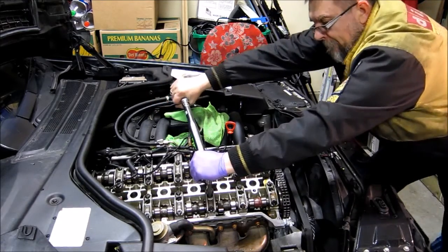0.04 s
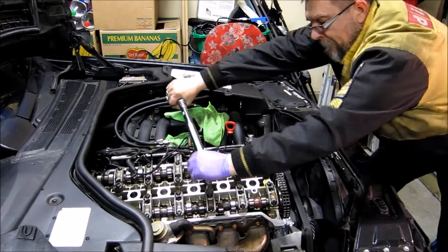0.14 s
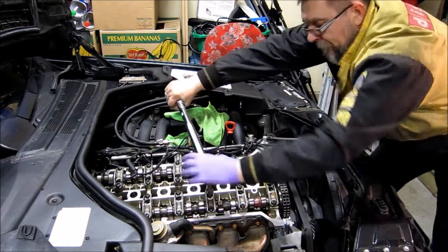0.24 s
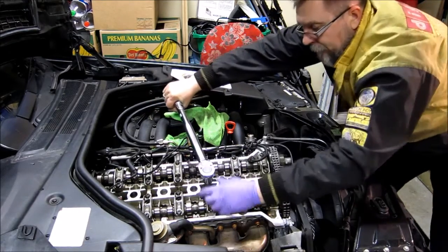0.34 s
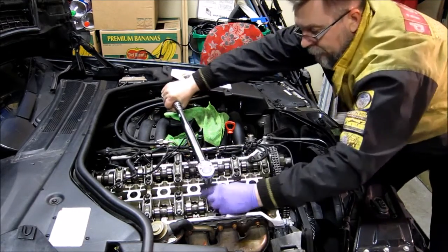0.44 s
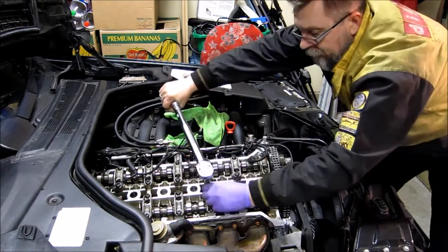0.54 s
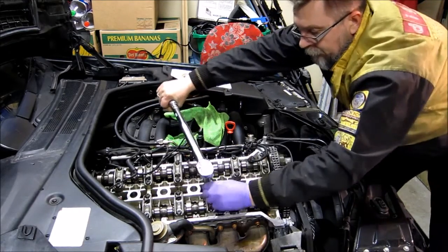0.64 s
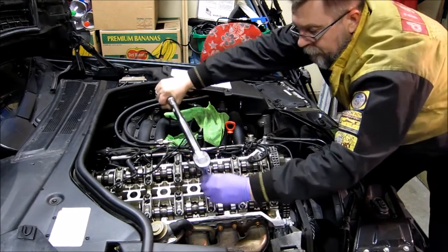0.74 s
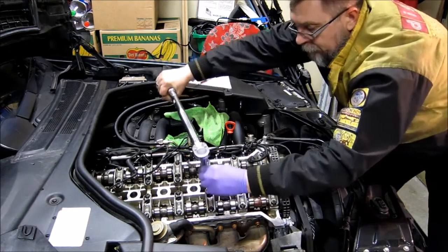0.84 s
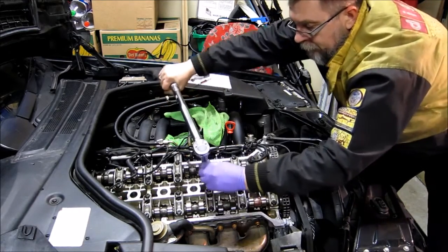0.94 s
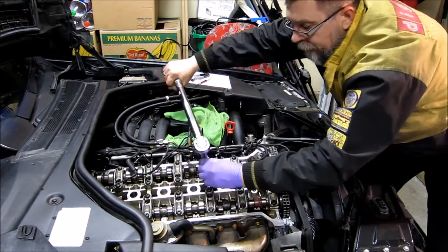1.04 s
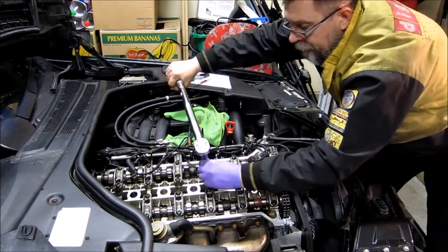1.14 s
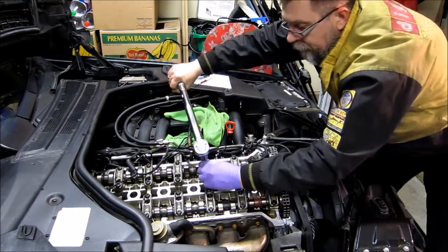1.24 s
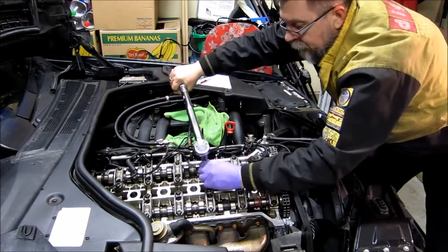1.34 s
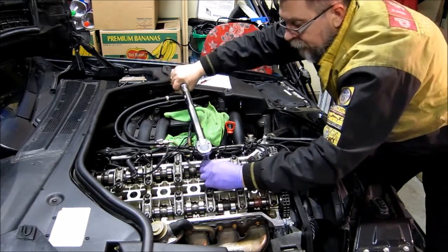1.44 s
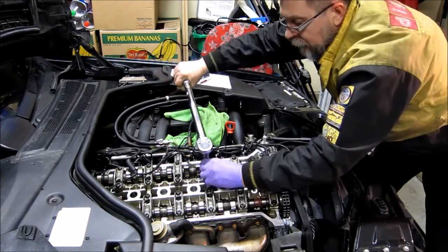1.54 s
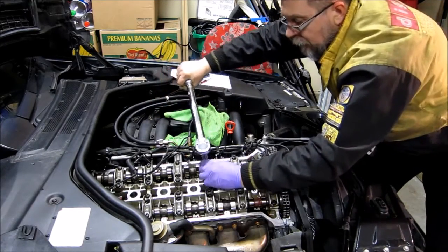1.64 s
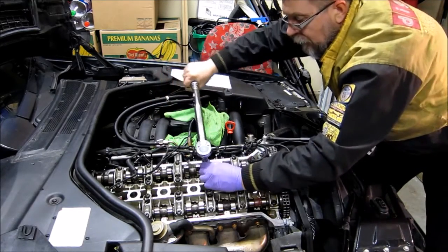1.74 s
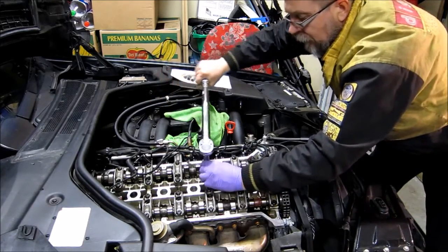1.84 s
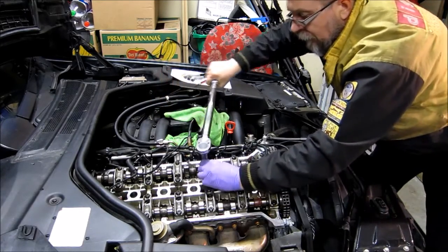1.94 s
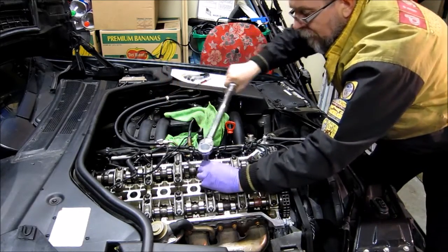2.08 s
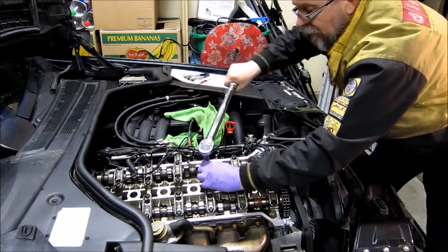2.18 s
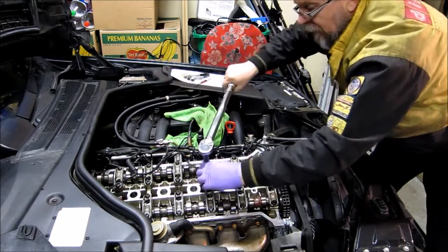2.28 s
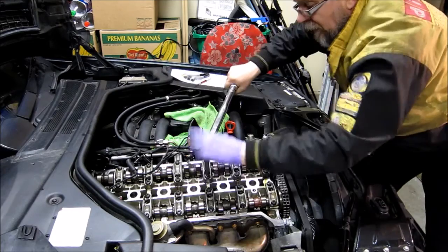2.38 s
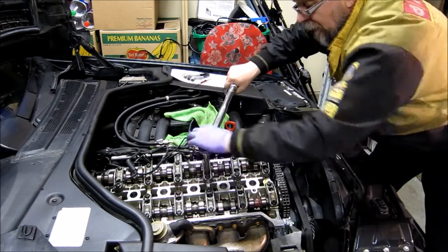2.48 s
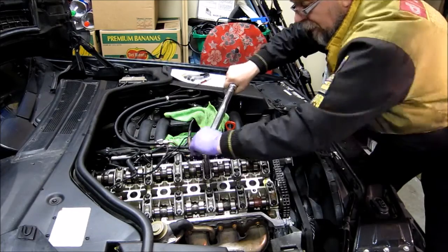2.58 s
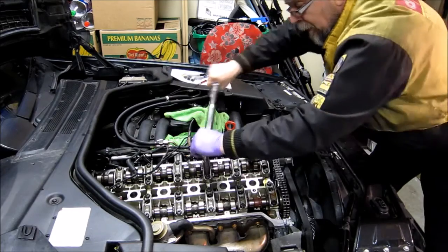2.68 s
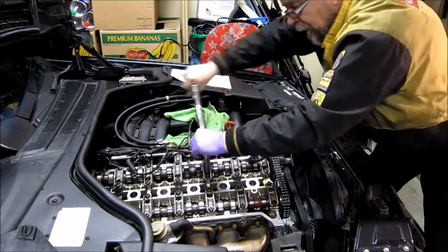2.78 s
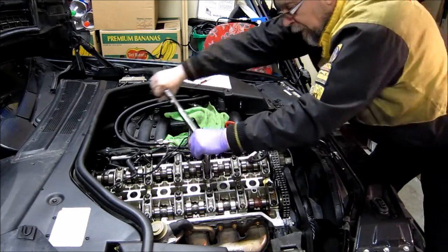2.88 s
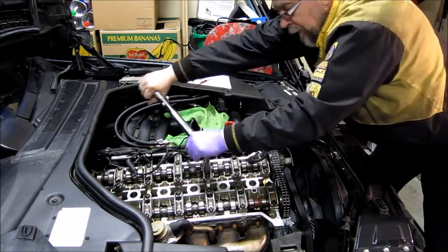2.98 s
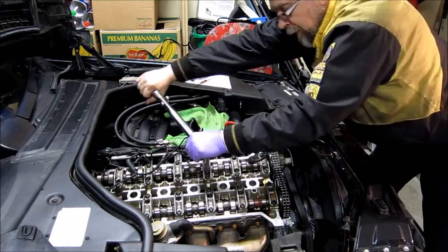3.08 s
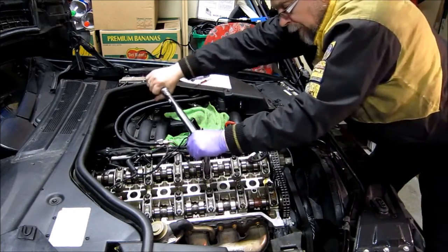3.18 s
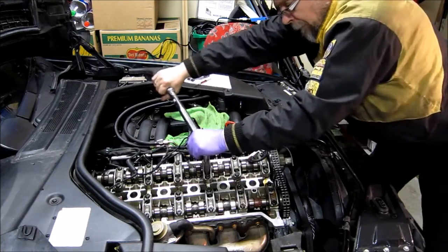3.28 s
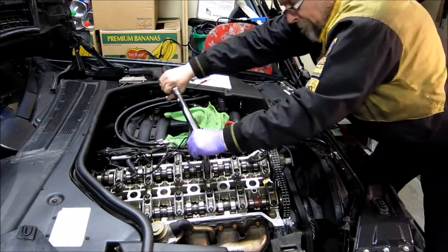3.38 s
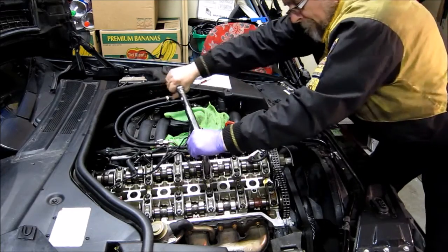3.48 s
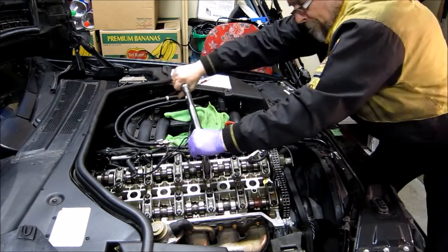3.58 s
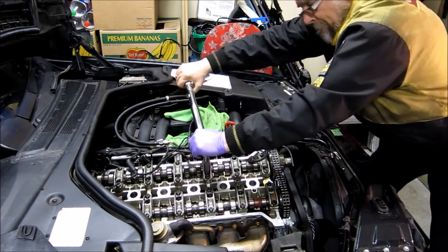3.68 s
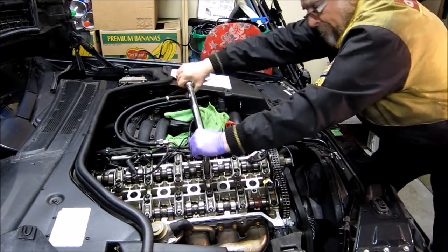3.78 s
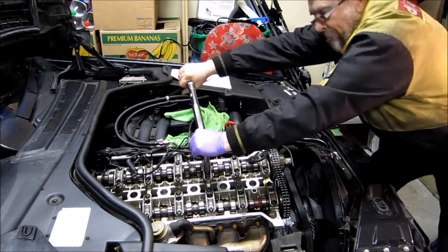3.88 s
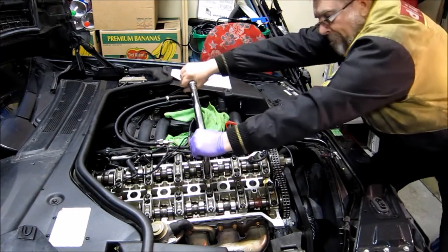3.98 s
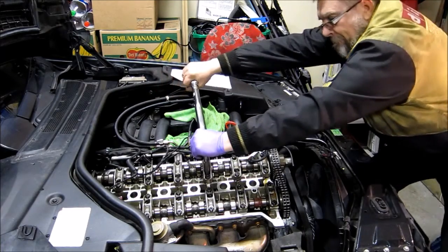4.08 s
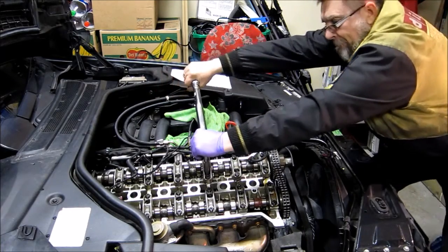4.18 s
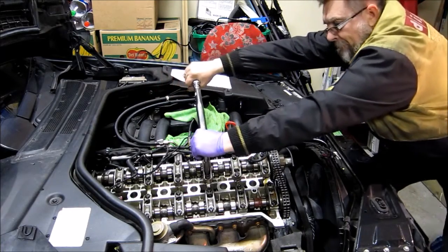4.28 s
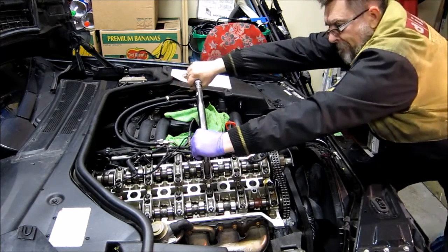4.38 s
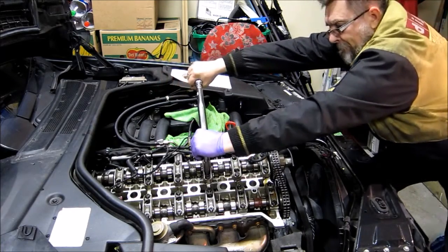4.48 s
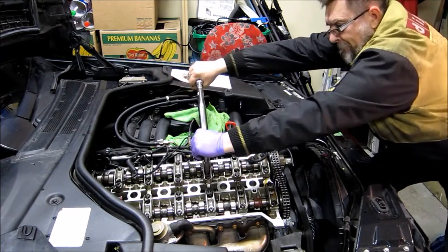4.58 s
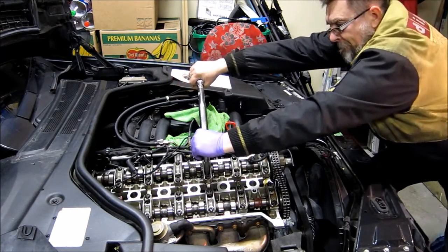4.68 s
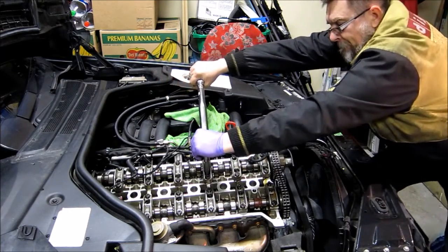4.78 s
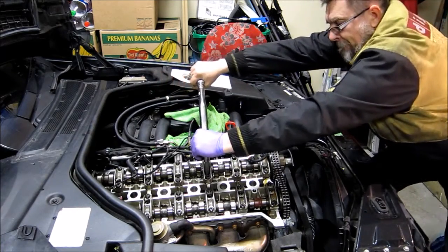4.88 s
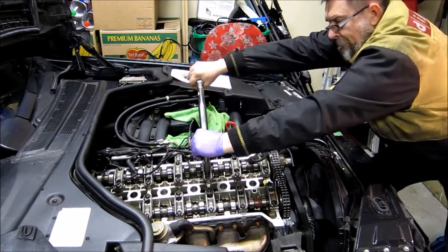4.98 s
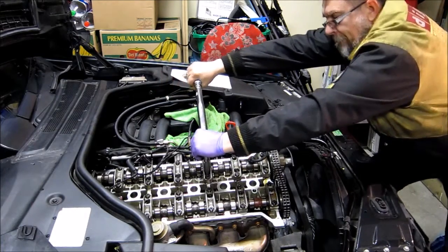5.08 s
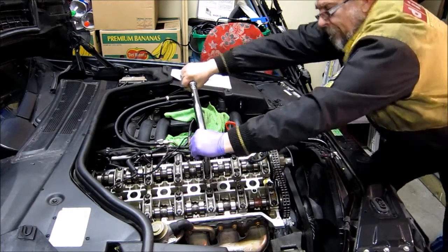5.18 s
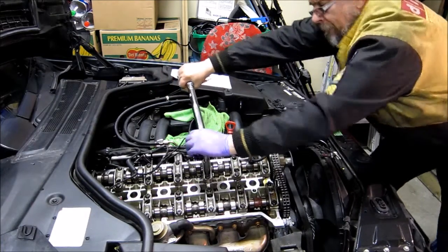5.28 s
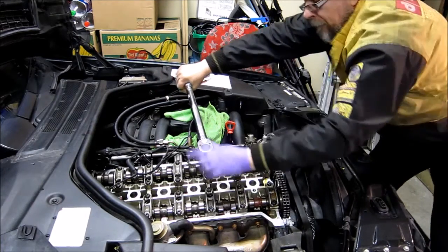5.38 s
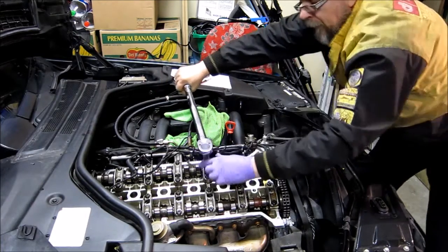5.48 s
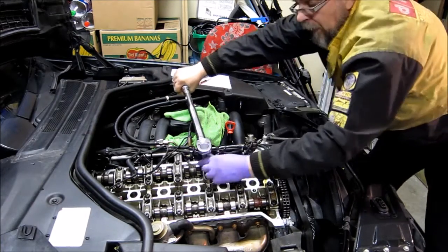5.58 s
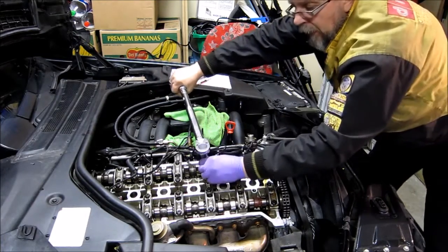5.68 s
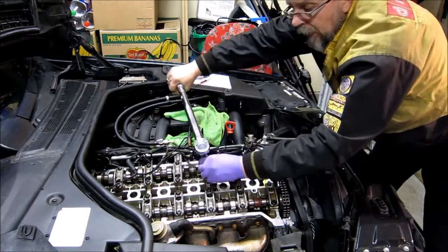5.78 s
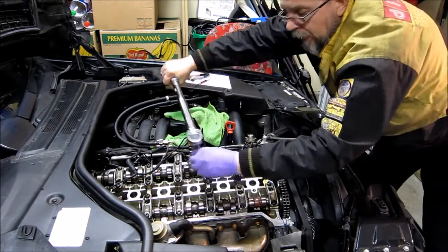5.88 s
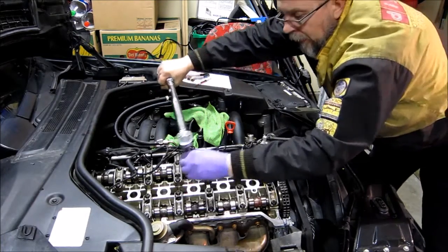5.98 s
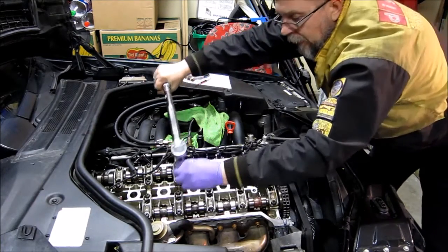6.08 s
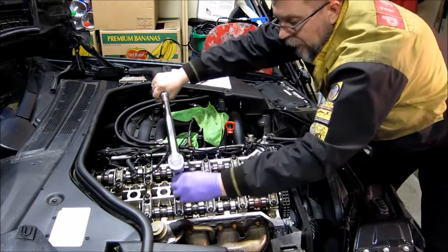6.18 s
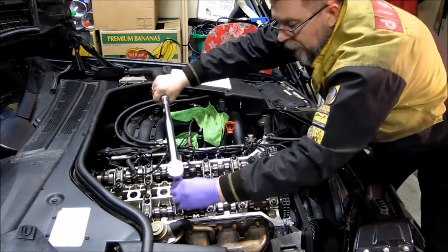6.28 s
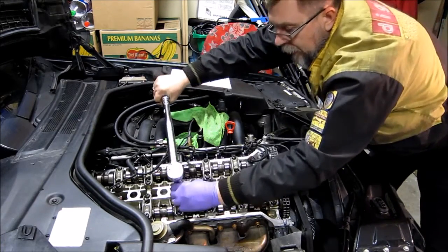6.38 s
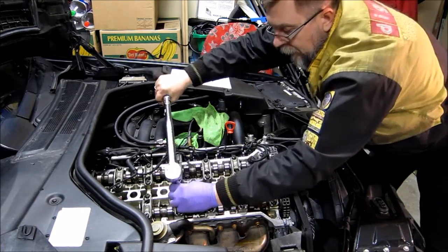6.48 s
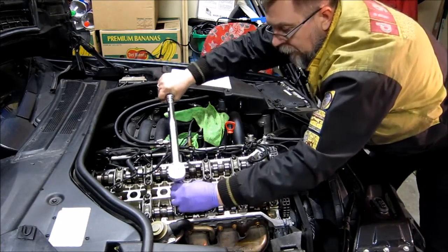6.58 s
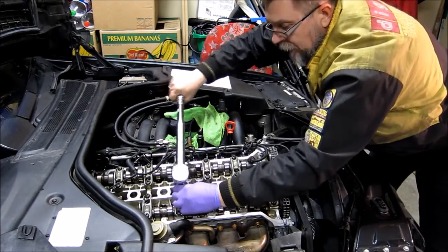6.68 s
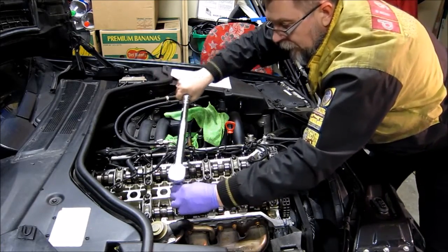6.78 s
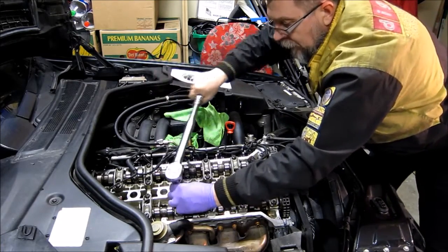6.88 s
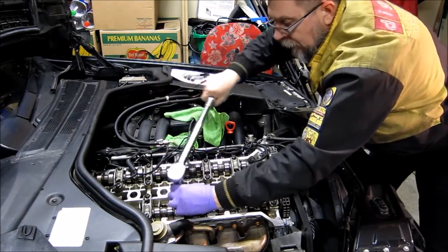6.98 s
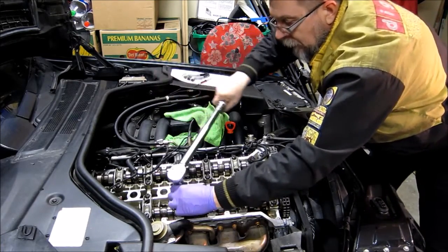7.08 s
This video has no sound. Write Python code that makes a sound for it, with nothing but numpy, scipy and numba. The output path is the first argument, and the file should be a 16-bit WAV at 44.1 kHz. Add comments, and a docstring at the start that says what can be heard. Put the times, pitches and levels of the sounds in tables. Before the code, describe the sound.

In a small garage, a torque wrench snaps sharply at once, then its steel socket clinks and rattles from bolt to bolt. A quieter pull with a faint low drone leads to two very hard clicks half a second apart, then more knocks. Close stereo microphones catch short engine-bay echoes; fan hum ducks after loud hits and swells back.

```python
"""Torque wrench in a small garage

A click-type torque wrench tightens bolts on an open cylinder head: bursts of tiny steel contacts
excite resonances, giving sharp cracks and the knocks and rattles of its socket from bolt to bolt.
Steady tones and shaped noise make the fan behind, with a low drone and a few dull thumps.
An automatic gain control ducks at each loud click and lets the hum swell back."""
import sys
import numpy as np
from scipy import signal
from scipy.fft import rfft, irfft
from scipy.io import wavfile
from scipy.ndimage import uniform_filter1d, minimum_filter1d
from numba import njit

SR = 44100
rng = np.random.default_rng(int(sys.argv[2]) if len(sys.argv) > 2 else 0)


def master(y):
    """Save y as 16-bit WAV."""
    cut = np.clip(np.atleast_2d(y).T, -1, 1)
    pcm = np.round(cut * 32767)  # scale
    wavfile.write(sys.argv[1], SR, pcm.astype(np.int16))


N = 314874
TIME = np.arange(N) / SR
SIZE = 18432  # samples in one blow or echo response
FREQ = np.maximum(np.fft.rfftfreq(SIZE, 1 / SR), 1)
AGE = np.arange(SIZE) / SR
LEAD_IN = SIZE // 32  # samples before the hit, room for its build-up
# a long ring dies away to nothing by the end of its buffer
FADE = np.minimum(1, 3 * (1 - AGE / AGE[-1])) ** 2


def undb(db):
    """Decibels to gain."""
    return 10 ** (np.asarray(db) / 20)


def read(points, hz):
    """A table of (Hz, value) read on a log-frequency axis."""
    f, value = np.transpose(points)
    return np.interp(np.log(np.maximum(hz, 1)), np.log(f), value)


def unit(x):
    """Scale to an energy of one."""
    return x / np.sqrt(np.sum(x ** 2, axis=-1, keepdims=True))


def causal(db):
    """The minimum-phase response that has these gains."""
    cepstrum = irfft(db * np.log(10) / 20)
    cepstrum[1:SIZE // 2] *= 2
    cepstrum[SIZE // 2 + 1:] = 0
    return np.exp(rfft(cepstrum))


def resonance(f, hz, width):
    """Response of one mode, gain 1 at its centre."""
    return 1j * f * width / (hz ** 2 - f ** 2 + 1j * f * width)


def mode(hz, t60):
    """A resonance that rings for t60 seconds; steel that is not quite round splits it into a close pair."""
    width = np.log(1000) / np.pi / t60
    lower, upper = resonance(FREQ, hz * .996, width), resonance(FREQ, hz * 1.004, width)
    return (lower + upper) / np.sqrt(2)


def noise(gain):
    """Noise of rms 1 whose spectrum follows gain(Hz)."""
    spectrum = rfft(rng.standard_normal(N))
    x = irfft(spectrum * gain(np.fft.rfftfreq(N, 1 / SR)), N)
    return x / x.std()


def walk(rate):
    """A slow random wander of spread 1."""
    return noise(lambda f: np.exp(-(f / rate) ** 2))


# the wrench breaking over or snapping back; tilt is per octave, ring levels precede the shared body colour:
# start_s, level_db, rattle_ms, thud_db, tilt_db, first_brief_hz, first_brief_db,
# second_brief_hz, second_brief_db, long_ring_hz, long_ring_db
CLICKS = [(0.1121, 3, 3.85, -3, 0, 1818, 13, 2375, 16.5, 2660, 9.5),
          (4.7179, 14.5, 1.94, 3.5, 1.6, 2150, 12, 4060, 9, 4145, 8.5),
          (5.2105, 10.5, 3.9, -5.5, -0.06, 2215, 21.5, 755, 2.5, 2220, 9.5)]
# relative colour of the wrench steel: pitch_hz, level_db
WRENCH_STEEL = [(90, -25), (300, -18.5), (700, -13), (1300, -17), (1700, -11), (2200, -12.5), (3000, -1.5),
                (4000, -0.5), (5500, -4), (6800, -3.5), (10000, -6.5), (12500, -12.5), (16000, -33.5)]
# short resonances of the click mechanism, levels before modes_db: pitch_hz, width_hz, level_db
MECHANISM_MODES = [(316, 20, 9), (1770, 570, -1), (2150, 240, 6), (2320, 40, -6), (3180, 190, -9.5),
                   (3950, 78, -5.5), (4720, 140, -7.5), (6000, 180, -2.5), (6640, 140, 4.5), (7250, 48, -7),
                   (10000, 330, -8.5)]
# what all clicks share: a quick build-up, their treble, and the ring times of brief and long modes
CLICK_LEAD_MS, CLICK_TREBLE_DB, CLICK_BRIEF_T60_S, CLICK_RING_T60_S = 0.49, -2.5, 0.03, 0.33


def wrench(modes_db, tube_db):
    """The mechanism snaps: one hard crack with two brief rings, and one mode of the tube standing out."""
    out = np.zeros((5, N))
    ring = ringing(MECHANISM_MODES, modes_db)
    sustain = undb(tube_db) * tube()
    for (s, db, rattle_ms, thud_db, tilt_db, first_hz, first_db,
         second_hz, second_db, long_hz, long_db) in CLICKS:
        first = undb(first_db) * mode(first_hz, CLICK_BRIEF_T60_S)
        second = undb(second_db) * mode(second_hz, CLICK_BRIEF_T60_S)
        rings = ring + beamed(room_db=-4) * (first + second)
        ping = undb(long_db) * mode(long_hz, CLICK_RING_T60_S)
        crack = blow(WRENCH_STEEL, rings, sustain + ping, CLICK_LEAD_MS, rattle_ms,
                     thud_db, CLICK_TREBLE_DB, tilt_db)
        add(out, crack, s, db)
    return out


# the socket touches a bolt head, then seats on it; tilt is per octave, touch_db is against the seating:
# start_s, level_db, touch_db, seats_after_ms, rattle_ms, tilt_db, treble_db, ring_hz, ring_db,
# engine_clank_hz, engine_clank_db, tube_db
KNOCKS = [(0.654, -33, 0.5, 4.7, 8, -1, 9, 6860, 15, 3360, -13, 12),
          (0.7894, -33.5, -0.5, 1.2, 9.3, -1.5, 9.5, 6540, 4, 4930, -5, -8),
          (1.2142, -11, -1.5, 1.62, 8.6, 2.5, 12, 5480, -5, 1200, 0, 5),
          (1.584, -21.5, 0, 2.1, 3.3, 1.5, 11, 3180, -16, 1470, -2, 3),
          (1.659, -36, 2.5, 0.8, 3, -3, 2, 2300, 5, 1900, -3, -7),
          (1.7584, -41.5, 1.5, 9.3, 1.6, 0.5, 7, 5740, 3, 2100, 0, -14),
          (1.9887, -22, 4, 1.39, 3.2, -2, -5, 3380, 19, 910, -7, -1),
          (1.9907, -13, -1.5, 0.89, 1.7, 5.5, 11, 6600, 14.5, 810, 4, -11),
          (2.0025, -11, -9, 3.55, 4.1, -0.1, 16.5, 4000, 7, 620, 1, -3),
          (2.353, -39, -6, 0.9, 2, 1, -1, 3000, 5, 2000, 2, 4),
          (2.556, -36.5, 1.5, 12, 12, -4, 24, 5900, 4, 800, 6, -15),
          (2.686, -46.5, -0.5, 17, 22, 5.5, 14, 6600, 6, 1980, -11, -7),
          (2.733, -45.5, -2, 39, 5.3, 5, 2, 5550, 7, 3500, -4, -1),
          (2.8226, -15, -7.5, 2.6, 4.3, 4.5, 5, 2660, 6.5, 1940, 5, -25),
          (2.9136, -16, -6, 5.6, 4.3, 4, 4.5, 5010, 7, 2090, -4.5, -9),
          (5.795, -32.5, -0.5, 13.2, 9.1, -2.2, 20.5, 3420, 13, 1700, -6.5, -8),
          (5.8477, -27.5, -5, 13, 5.1, -1.3, 11, 2920, 5, 1710, -4, -1),
          (5.877, -36.5, -1, 2.1, 6.1, -5, 6, 1720, 1, 1090, 1, -1),
          (6.3622, -9.5, 5.5, 1, 4, 4.5, 6.5, 3900, 2.5, 640, 12, -5.5),
          (6.4794, -25.5, -0.5, 0.68, 5.7, 2, -3, 4160, 5, 2820, 3, -8),
          (6.617, -39.5, -12, 0.65, 5.8, -2.5, -6, 2620, 14, 1560, -1, -1),
          (6.6448, -10.5, -21, 2.37, 9.1, 1.2, 14, 2850, 6.5, 1450, 3.5, -6),
          (7.0565, -10, -12.5, 4.5, 1.1, 5.5, 6, 6740, 6, 1140, 1, -15),
          (7.069, -21, -5, 1.44, 3, -1, 3, 4000, 11, 1700, -3, -3)]
# relative colour of the socket steel on its bolt: pitch_hz, level_db
SOCKET_STEEL = [(100, -20), (500, -10), (1100, -6), (1800, 3), (3000, 4.5), (4500, 3), (7000, -7.5),
                (11000, -20), (13000, -25.5), (16000, -43.5)]
# short resonances of the socket, levels before modes_db: pitch_hz, width_hz, level_db
SOCKET_MODES = [(2766, 43, 10.5), (2620, 300, -8.5), (3164, 93, 5.5), (3920, 64, -0.5), (4210, 140, -14),
                (4640, 20, -8), (5330, 72, -8), (5370, 110, -3), (6300, 250, -3.5), (10500, 46, -4),
                (10650, 690, -0.5), (11190, 220, 6.5)]
# a blow softer than FIRM_DB builds up more slowly, with slightly less thud
FIRM_DB, FIRM_LEAD_MS, LEAD_MS_PER_DB, FIRM_THUD_DB, THUD_PER_DB = -17, 0.55, 0.33, 6.5, -0.08
# what all knocks share: the touch is shorter than the seating, and ring and clank are brief
TOUCH_LENGTH_SHARE, KNOCK_RING_T60_S, CLANK_T60_S = 0.53, 0.012, 0.019


def socket(modes_db):
    """A touch and a seating blow; the landing picks one mode and one engine clank, the grip damps the tube."""
    out = np.zeros((5, N))
    ring = ringing(SOCKET_MODES, modes_db)
    sustain = tube()
    for (s, db, touch_db, seat_ms, rattle_ms, tilt_db, treble_db,
         ring_hz, ring_db, clank_hz, clank_db, tube_db) in KNOCKS:
        softness = max(FIRM_DB - db, 0)
        lead_ms = FIRM_LEAD_MS + LEAD_MS_PER_DB * softness
        thud_db = FIRM_THUD_DB + THUD_PER_DB * softness
        landing = undb(ring_db) * mode(ring_hz, KNOCK_RING_T60_S)
        clank = undb(clank_db) * mode(clank_hz, CLANK_T60_S)
        rings = ring + beamed(room_db=-2) * (landing + clank)
        touch = s, db + touch_db, rattle_ms * TOUCH_LENGTH_SHARE
        seating = s + seat_ms / 1000, db, rattle_ms
        for when, strength_db, length_ms in (touch, seating):
            knock = blow(SOCKET_STEEL, rings, undb(tube_db) * sustain, lead_ms, length_ms,
                         thud_db, treble_db, tilt_db)
            add(out, knock, when, strength_db)
    return out


# modes of the wrench tube, levels before each blow's tube_db: pitch_hz, level_db, t60_s
TUBE_MODES = [(1712, 5, 0.32), (2245, 8, 0.44), (2331, 4, 0.26), (2606, 1, 0.21), (2853, 2, 0.3),
              (3400, 3, 0.26), (3709, -1, 0.22), (4100, -1, 0.38), (4425, -4, 0.4), (4790, 0, 0.29),
              (6080, 0, 0.34), (6720, -5, 0.28), (7009, 1, 0.23), (7300, 0, 0.27)]


def tube():
    """The long ring of the wrench tube."""
    return sum(undb(db) * mode(hz, t60) for hz, db, t60 in TUBE_MODES)


def ringing(modes, modes_db):
    """The bare crack and the short resonances of the struck part."""
    return 1 + sum(undb(db + modes_db) * resonance(FREQ, hz, width) for hz, width, db in modes)


def beamed(room_db):
    """Gain of a brief ring in each direction: full towards the microphones, weaker into the room."""
    return undb(room_db * (np.arange(5) > 0))[:, None]


def contact(onset, lead_ms, rattle_ms, count=5):
    """Tiny steel contacts build up, hit and die away; one spectrum for each direction of radiation."""
    ms = (AGE - onset) * 1000
    build_up = .5 * np.exp(-abs(ms) / lead_ms)
    decay = np.exp(-(abs(ms) / rattle_ms) ** 1.6)
    force = np.where(ms < 0, build_up, decay)
    burst = rfft(force * rng.standard_normal((count, SIZE)))
    # hard contacts feed all broad bands alike
    power = uniform_filter1d(uniform_filter1d(abs(burst) ** 2, size=300), size=300)
    return burst / np.sqrt(abs(power) + 1e-12)


TILT_PIVOT_HZ = 3500


def blow(steel, rings, sustain, lead_ms, rattle_ms, thud_db, treble_db, tilt_db=0):
    """Contacts coloured by the steel and its short resonances; the long modes get one clean push."""
    low, high = 1 / (1 + (FREQ / 1300) ** 4), 1 / (1 + (7500 / FREQ) ** 4)
    octaves = np.log2(np.maximum(FREQ / TILT_PIVOT_HZ, 1 / 8))
    body = causal(read(steel, FREQ) + thud_db * low + treble_db * high + tilt_db * octaves)
    burst = contact(LEAD_IN / SR, lead_ms, rattle_ms)
    push = np.exp(-2j * np.pi * FREQ * LEAD_IN / SR)  # a single impulse at the hit
    return unit(irfft(body * (burst * rings + push * sustain)) * FADE)


def add(out, sound, s, db):
    """Place a blow at s seconds; the level is that of its energy spread over 5 ms."""
    start = int(s * SR) - LEAD_IN
    part = sound[:, :N - start]
    out[:, start:start + part.shape[1]] += part * undb(db) * np.sqrt(.005 * SR)


# side-to-mid balance of the echoes; for the fan air only its shape counts: pitch_hz, side_minus_mid_db
WIDTH = [(60, -11.5), (400, -7.5), (1300, -5), (4400, -2.5)]
# the right microphone hears more of the top treble: pitch_hz, left_minus_right_db
BALANCE = [(300, -1), (2400, -0.2), (4400, 1), (7000, 0), (10000, -5.5), (15000, -5.5)]


def garage(rays):
    """The first ray reaches the microphones directly; the others come back as echoes."""
    ears, centre = np.array([[1], [-1]]), SIZE // 256
    width, balance = undb(read(WIDTH, FREQ)), undb(ears * read(BALANCE, FREQ) / 2)
    out = 0
    for k, ray in enumerate(rays):
        if k == 0:
            # the two ports hear the direct treble slightly out of step
            response = np.exp(1j * ears * 0.12 * (FREQ / 10000) ** 2)
        else:
            mid, side = echoes(bay_db=-9.5, bay_t60=0.078, room_db=-14.0, gap_s=.002, build_s=0.0036)
            response = mid + ears * width * side
        impulse = np.roll(irfft(response * balance), centre, axis=1) * FADE
        out = out + signal.oaconvolve(ray[None], impulse, axes=1)[:, centre:centre + N]
    return out


# ring time of the garage, before the buffer's fade: pitch_hz, t60_s
GARAGE_RING = [(200, 0.39), (800, 0.43), (2500, 0.31), (6000, 0.29), (12000, 0.19)]


def echoes(bay_db, bay_t60, room_db, gap_s, build_s):
    """Mid and side spectra of one path: quick echoes off bonnet and engine bay, then the garage ring."""
    since = np.maximum(AGE - gap_s, 0)
    # the fourth power leaves a few strong reflections among many weak ones
    scatter = rng.standard_normal((2, SIZE)) * rng.random((2, SIZE)) ** 4
    bay = unit(scatter * (since > 0) * undb(-60 * since / bay_t60))
    edges, tail = np.geomspace(100, SR / 2, num=9), 0
    white = rfft(rng.standard_normal((2, SIZE)))
    for lo, hi in zip(edges, edges[1:]):
        band = irfft(white * ((FREQ >= lo) & (FREQ < hi)))
        tail = tail + band * undb(-60 * since / read(GARAGE_RING, np.sqrt(lo * hi)))
    room = unit(tail * (1 - np.exp(-since / build_s)))
    return rfft(undb(bay_db) * bay + undb(room_db) * room)


# dull bumps, as of someone leaning on the car; levels before the soft onset: start_s, pitch_hz, level_db
THUMPS = [(0.53, 169, -38.5), (3.896, 109, -45), (3.94, 141, -36)]


def thumps(t60_s, rise_s):
    """Dull, soft bumps: one low mode each, the same in both ears."""
    out = 0
    for s, hz, db in THUMPS:
        age = np.maximum(TIME - s, 0)
        envelope = undb(db - 60 * age / t60_s) * (1 - np.exp(-age / rise_s))
        out = out + envelope * np.sin(2 * np.pi * hz * age)
    return out


# the drone swells during the long pull and falls away around the click
DRONE_FROM_S, DRONE_TO_S, DRONE_RISE_S, DRONE_FALL_S = 3.74, 4.65, 0.15, .13
DRONE_DB, DRONE_REST_DB = -52.5, -72.5


def drone(hz, width_hz):
    """A narrow, uneven low rumble of filtered noise that rises, holds and falls."""
    corners = [DRONE_FROM_S - DRONE_RISE_S, DRONE_FROM_S, DRONE_TO_S, DRONE_TO_S + DRONE_FALL_S]
    swell = np.interp(TIME, corners, [0, 1, 1, 0])
    rumble = noise(lambda f: abs(resonance(f, hz, width_hz)) ** 2)
    return rumble * undb(DRONE_REST_DB + swell * (DRONE_DB - DRONE_REST_DB))


# fan tones, levels before HUM_DB and flutter: pitch_hz, level_db
HUM = [(214.4, -61), (428.7, -54.5), (548.1, -58.5), (643, -68), (722, -61), (857.4, -55.5), (1072, -68.5),
       (1272, -62.5), (1486, -62), (1630, -64.5), (1708, -61.5), (3122, -67)]
# relative colour of the air of fan and garage: pitch_hz, level_db
AIR = [(25, -2), (60, 3), (140, 4), (300, -2), (650, -7), (1100, -6.5), (1700, -4), (2400, -9), (3200, -9),
       (5000, -14.5), (7000, -23), (11000, -24.5), (15000, -33)]
AIR_DB, HUM_DB = -48.5, -0.5  # rms of the mid air; trim on the tones


def fan(wander, flutter_db, side_db):
    """Slightly wavering fan tones over a wide rush of air."""
    turns = np.cumsum(1 + wander * walk(3)) / SR  # all tones waver together in pitch
    hum = 0
    for hz, db in HUM:
        level = undb(db + HUM_DB + flutter_db * walk(1.9))
        hum = hum + np.sqrt(2) * level * np.sin(2 * np.pi * (hz * turns + rng.random()))
    mid = noise(lambda f: undb(read(AIR, f)))
    side = noise(lambda f: undb(read(AIR, f) + read(WIDTH, f))) * undb(side_db)
    return hum + undb(AIR_DB + .5 * walk(0.94)) * np.array([mid + side, mid - side])


def scene():
    """Wrench and socket in the garage, over thumps, drone and fan."""
    steel = wrench(modes_db=0.5, tube_db=-3.5) + socket(modes_db=-2.5)
    bumps = thumps(t60_s=0.17, rise_s=0.0092)
    rumble = drone(hz=97, width_hz=11)
    return garage(steel) + bumps + rumble + fan(wander=0.00091, flutter_db=1.5, side_db=-3.0)


@njit
def gain_control(peak, top, attack_s, release_s):
    """Gain in dB: it drops quickly when the level passes the top and creeps back."""
    gain_db, level, cut = np.empty(len(peak)), 0., 20.  # it starts turned down
    for i in range(len(peak)):
        level += (peak[i] - level) / (attack_s * SR)
        cut = max(cut - cut / (release_s * SR), 20 * np.log10(level / top + 1e-9))
        gain_db[i] = -cut
    return gain_db


# the gain control's threshold and reaction time, the limiter's ceiling, and the top of the band
FULL_DB, DUCK_S, CEILING_DB, TOP_HZ = -11, .0018, -0.73, 16000


def record(dry):
    """Notch out a narrow treble band, ride the gain, limit what slips through and cut the top."""
    notch = signal.butter(3, [7650, 8850], "bandstop", fs=SR, output="sos")
    x = signal.sosfilt(notch, dry)
    gain_db = gain_control(abs(x).max(axis=0), float(undb(FULL_DB)), attack_s=0.00029, release_s=0.52)
    # the gain lags a little, so the front of a click slips through
    slew = 1 / (DUCK_S * SR)
    lagged_db = gain_db[0] + signal.lfilter([slew], [1, slew - 1], gain_db - gain_db[0])
    x = x * undb(lagged_db)
    limit = np.minimum(1, undb(CEILING_DB) / (abs(x).max(axis=0) + 1e-9))
    x = x * uniform_filter1d(minimum_filter1d(limit, size=21), size=21)
    return signal.sosfilt(signal.ellip(8, .2, 70, TOP_HZ, fs=SR, output="sos"), x)


dry = scene()
out = record(dry)
master(out)
```